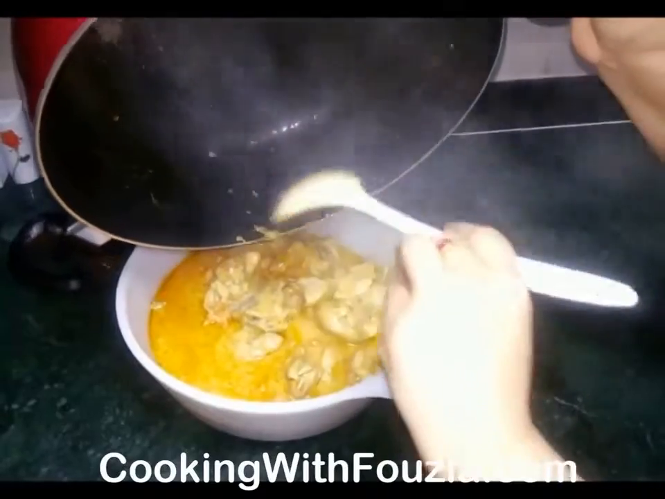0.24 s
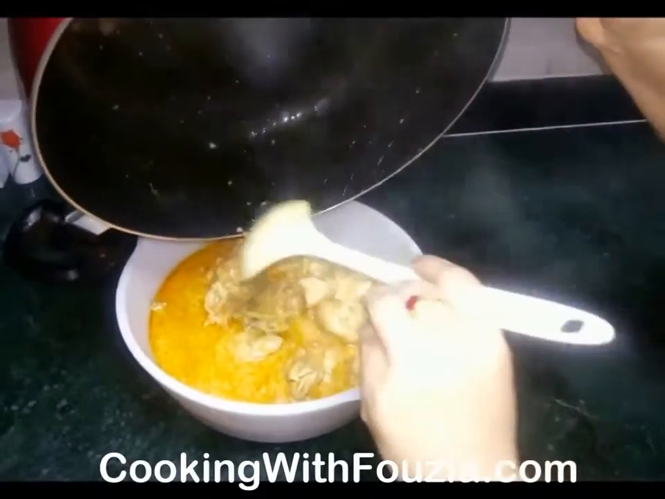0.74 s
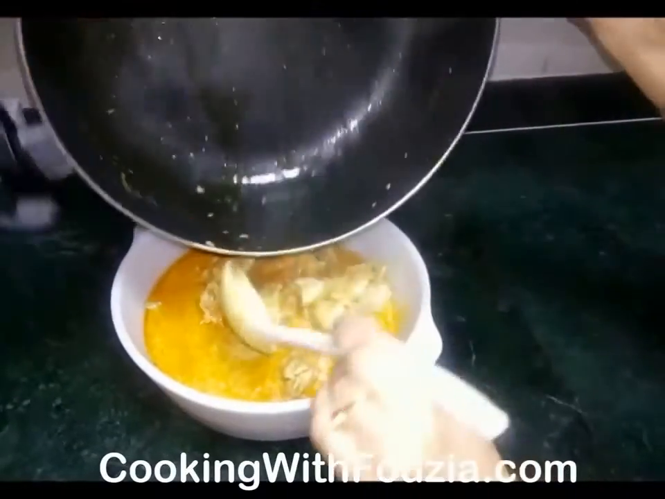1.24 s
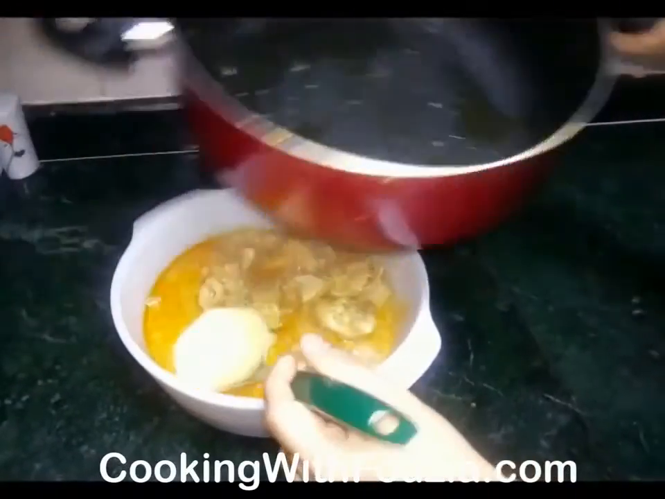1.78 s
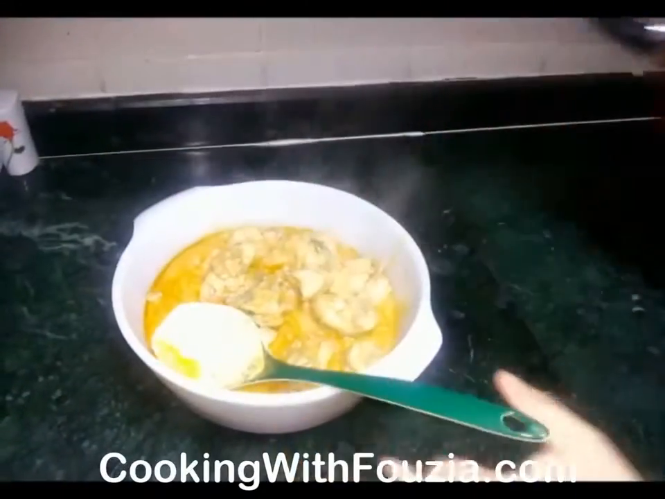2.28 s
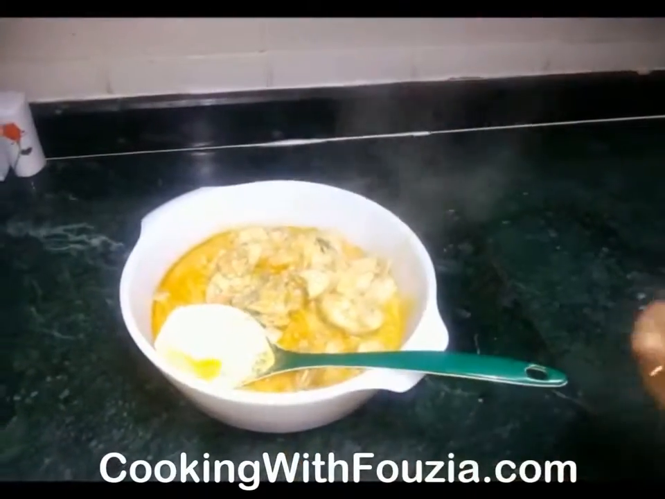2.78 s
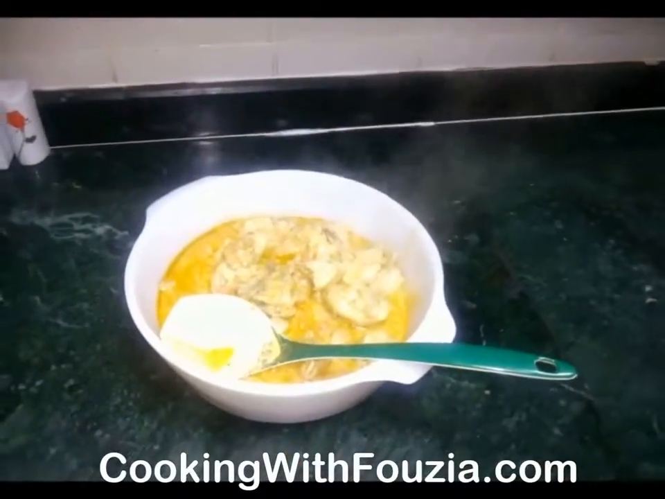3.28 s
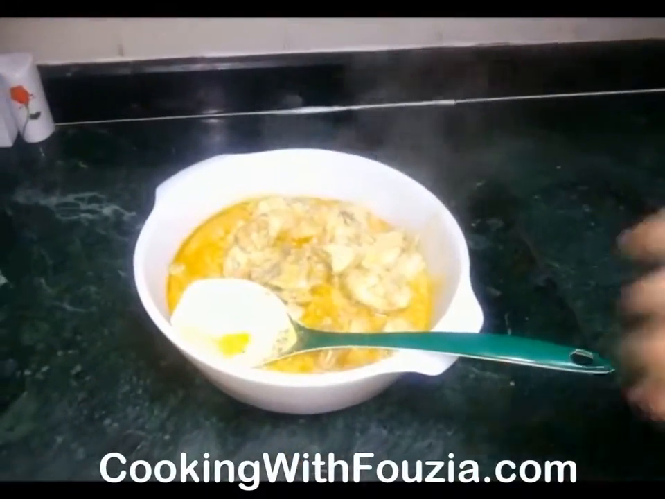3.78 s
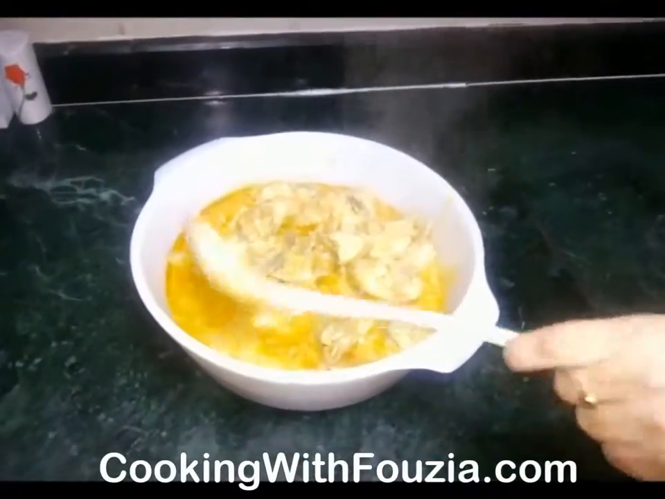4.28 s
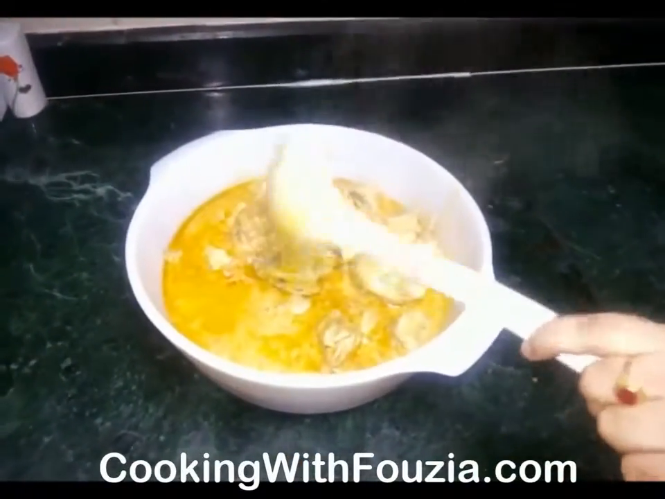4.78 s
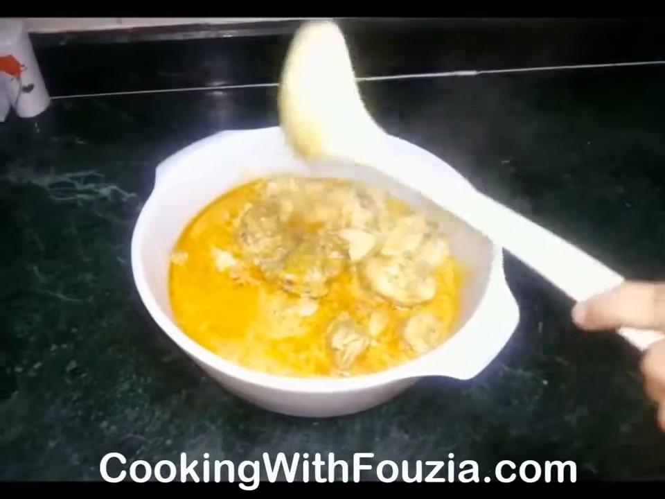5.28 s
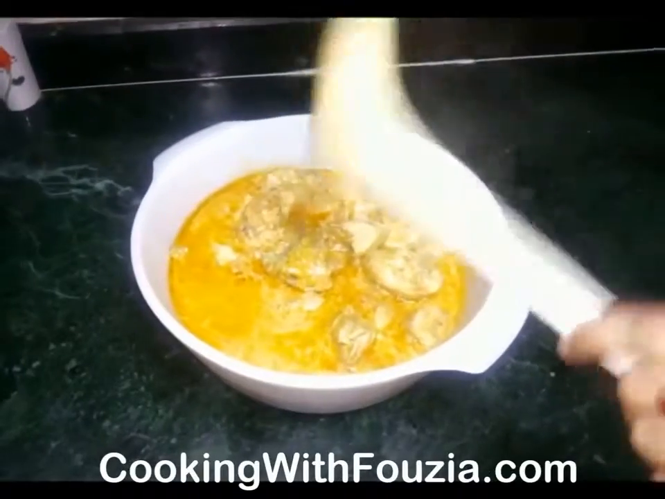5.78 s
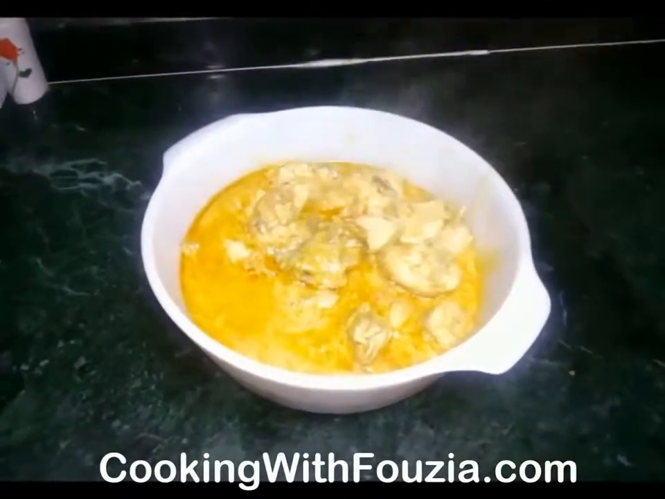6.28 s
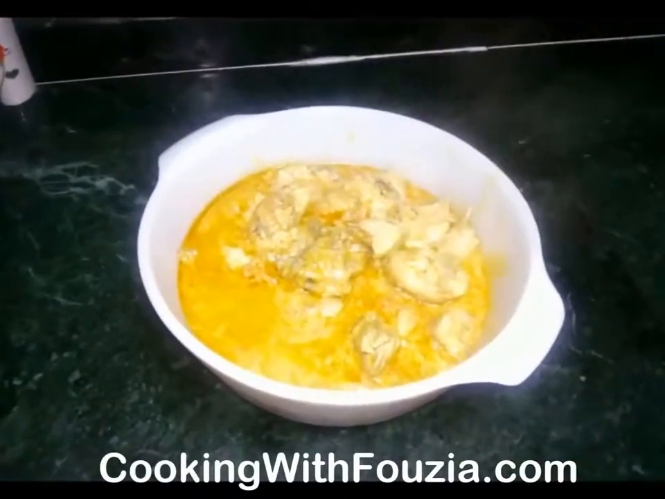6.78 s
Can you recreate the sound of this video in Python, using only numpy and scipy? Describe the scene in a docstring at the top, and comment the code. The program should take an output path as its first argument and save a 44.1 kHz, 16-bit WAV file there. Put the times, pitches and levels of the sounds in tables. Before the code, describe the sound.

Right at the start a ladle knocks inside a metal cooking pot and scrapes briefly along its wall. At about 0.5 seconds it strikes the rim with the loudest, ringing knock and a quick chatter, slightly overloading the small, close microphone. A lighter knock follows at 1.2 seconds. Between 1.9 and 2.4 seconds a spoon clinks softly several times in a china bowl, followed by small taps and faint drips of sauce. At about 3.9 seconds the pot lands on a stone counter with a damped ring and rocks to rest in fading knocks until 4.8 seconds. Faint taps come near 5.6 and 6.2 seconds. At 6.9 seconds the ladle clatters sharply onto the counter and bounces once. Throughout, a fan hums with a slight whine under faint hiss, and the hard kitchen walls add a short echo.

```python
"""Serving curry in a hard-walled kitchen

A ladle scrapes and knocks the last of the curry from a ringing metal pot. Sauce drips and a spoon
clinks in the china bowl. The empty pot lands on the stone counter and rocks, then the ladle drops
beside it. Each hit is a burst of shaped noise, with decaying sine modes wherever the object rings.
A fan hums under a faint hiss, and the small, close microphone clips on the loudest blows."""
import sys
import numpy as np
from scipy import signal
from scipy.fft import rfft, irfft, next_fast_len
from scipy.io import wavfile
from scipy.ndimage import map_coordinates

SR = 44100
rng = np.random.default_rng(int(sys.argv[2]) if len(sys.argv) > 2 else 0)


def output_pcm(signal):
    """Save a mono or channel-first signal as 16-bit PCM at the path in sys.argv[1].

    Samples are clipped to [-1, 1] before scaling.
    """
    pcm = np.clip(np.atleast_2d(signal).T, -1, 1) * 32767
    wavfile.write(sys.argv[1], SR, np.round(pcm).astype(np.int16))


N = 310905

# Thud, body, clack and fizz, the four bands of a hit: low f/Hz, high f/Hz
BANDS = [(100, 700), (700, 2500), (2500, 7000), (7000, 15800)]
# Each object's mix of those bands: level/dB for thud, body, clack, fizz
POT_BALANCE = [-22, -0.5, -0.5, -17]
TAP_BALANCE = [-12, 2.5, 4, -3.5]
SPOON_BALANCE = [-9, 0, 0.5, -18]
LANDING_BALANCE = [-10, 0, 1, -17]
LADLE_BALANCE = [-19.5, .5, -1, -9]
# EQ curves for the contact noises, the fan's rush and the hiss: f/Hz, level/dB
POT_EQ = [(90, -59), (180, -6.5), (330, -3), (420, 3.5), (600, -3), (900, -16), (1300, -11), (1950, -2.5),
          (2400, -10.5), (2800, -9.5), (3600, -18), (4600, -8.5), (6000, -17), (15500, -47)]
SCRAPE_EQ = [(150, -55), (250, -21), (387, -18), (499, -16), (698, -11), (1140, -6.5), (1440, -9.5),
             (1860, 1), (2350, -13.5), (2640, -13), (2780, -30), (3290, -13.5), (3580, -21), (5180, -12.5),
             (14000, -44.5)]
SPOON_EQ = [(120, -14), (300, -13), (520, 2), (760, -9), (1150, -6), (1750, 0.5), (2400, -8), (3050, -1.5),
            (3500, -7.5), (5200, -8), (7000, -16.5), (9000, -16), (15500, -42)]
LANDING_EQ = [(90, -16), (150, -7.5), (300, -2.5), (500, -3.5), (620, -0.5), (900, -0.5), (1300, -4.5),
              (1700, 1), (2400, -4.5), (3100, 4.5), (4300, -1.5), (5500, -1.5), (7200, -14), (15500, -38)]
LADLE_EQ = [(130, -60), (250, -26), (500, -18), (900, -18), (1150, -14), (1500, -1), (2000, -3.5),
            (2700, -9), (4300, -10.5), (5900, -5), (7000, -16), (9500, -24.5), (12500, -37), (15500, -34)]
RUSH_EQ = [(15, -64), (25, -28), (69, -32), (86, -19), (253, -7), (378, -6), (410, -6.5), (445, -6),
           (598, -10), (762, -9), (919, -11), (1080, -8), (2490, -20.5), (5280, -34), (15500, -35)]
HISS_EQ = [(1200, -3.5), (2500, -5.5), (5500, -3), (7500, -14.5), (15000, -20.5)]

# Names of the spots where the pot is struck: inside, rim, wall, base, heel
POT_PLACES = ["inside", "rim", "wall", "base", "heel"]
# The pot's modes: f/Hz, t60/s, then level/dB for a hit on each of those spots
POT_MODES = [(392.0, 0.14, -15.0, -2.0, 8, 8, -6.0), (455.0, 0.13, -25.0, -9.0, -4.0, 20, 17),
             (474.0, 0.36, 0.0, 4.0, 11.0, -3.0, -6.0), (780.0, 0.45, -18.0, 5.0, -6.0, -1.0, 8.0),
             (890.0, 0.25, -23.0, -11.0, -29.0, -3.0, 10), (1148.0, 0.72, -11.0, 6.0, -26.0, 8.0, -3.0),
             (1316.0, 0.33, -33.0, 6.0, -24.0, -8.0, -10.0), (1368.0, 0.52, -32.0, 6.0, 1.0, -4.0, -9.0),
             (1450.0, 0.33, -27.0, -7.0, -20.0, 4.0, -4.0), (1790.0, 0.34, -8.0, 0.0, -31.0, -10.0, -15.0),
             (1965.0, 0.3, -20.0, 1.0, -25.0, 1.0, -4.0), (2290.0, 0.45, -32.0, -7.0, -36.0, -16.0, -21.0),
             (2595.0, 0.45, -28.0, -8.0, -13.0, -14.0, -4.0),
             (2826.0, 0.45, -34.0, -12.0, -13.0, -21.0, -26.0),
             (2917.0, 0.4, -38.0, -11.0, -17.0, -20.0, -25.0),
             (3320.0, 0.33, -10.0, -13.0, -32.0, -20.0, -25.0),
             (3445.0, 0.28, -37.0, 5.0, -16.0, -4.0, -9.0),
             (3865.0, 0.34, -31.0, -19.0, -11.0, -7.0, -12.0),
             (4082.0, 0.32, -10.0, -9.0, -36.0, -28.0, -28.0),
             (4240.0, 0.36, -18.0, -8.0, -25.0, -26.0, -28.0),
             (4378.0, 0.35, -13.0, -6.0, -10.0, -15.0, -20.0),
             (4535.0, 0.33, -28.0, -5.0, -26.0, -21.0, -26.0),
             (4695.0, 0.35, -21.0, -7.0, -10.0, -23.0, -28.0),
             (4895.0, 0.34, -34.0, -13.0, -15.0, -15.0, -20.0),
             (5042.0, 0.35, -17.0, -8.0, -5.0, -20.0, -25.0),
             (5210.0, 0.36, -37.0, -10.0, -30.0, -16.0, -21.0),
             (5320.0, 0.33, -18.0, -23.0, -30.0, -10.0, -15.0),
             (5776.0, 0.3, -30.0, -2.0, -26.0, -17.0, -22.0),
             (6826.0, 0.28, -42.0, -7.0, -18.0, -28.0, -28.0),
             (7467.0, 0.2, -26.0, -17.0, -6.0, -19.0, -24.0)]
# Knocks on the pot, by the ladle inside and on the rim, then the pot's wall against the china bowl: t/s,
# rise/s, level/dB, brightness/dB per band, ring level/dB, spot
POT_KNOCKS = [(0.0, 0.0013, -17, -3, -17.5, "inside"), (.163, 0.0056, -33, 3.5, -20.5, "inside"),
              (.4653, 0.0002, -3.5, -3.5, -21.5, "rim"), (1.1925, 0.0024, -29, 12, -21.5, "wall")]
# Dead touches on the already ringing pot: t/s, rise/s, level/dB, brightness/dB per band
POT_CHATTER = [(.484, .003, -18.5, 1), (.516, 0.0049, -19.5, 1), (1.194, 0.0014, -34.5, -21)]
# The tones of the fan's whine: f/Hz, level/dB
FAN_TONES = [(258.4, -63.5), (646, -60), (766, -51)]
# Swells in the whine and in the hiss: centre t/s, half width/s, boost/dB
WHINE_SWELLS = [(2.6, 0.083, 8.6), (4.9, 1.97, 5.5), (6.5, 0.33, 4.5)]
HISS_SWELLS = [(2.27, 0.42, 12.7), (2.93, 0.16, 10.4), (6.7, 0.73, 10)]
# Bright little taps and dull drips: t/s, rise/s, level/dB, brightness/dB per band
TAPS_AND_DRIPS = [(1.012, 0.0021, -55, 2.5), (1.829, .0012, -61, 18.5), (2.441, 0.0036, -47, 1),
                  (2.767, 0.00026, -42, -4), (3.335, 0.0083, -64, -21.5), (3.731, 0.0015, -69.5, -28.5),
                  (5.638, 0.017, -55.5, 1.5), (6.212, 0.0087, -47.5, -2)]
# Spoon hits in the bowl: t/s, rise/s, level/dB, brightness/dB per band
SPOON_CLINKS = [(1.8955, 0.0021, -28, -2), (2.153, 0.0078, -34, -0.5), (2.331, 0.0017, -32.5, -1),
                (2.366, 0.0047, -35, -1.5)]
# The part of the spoon that meets the bowl: t/s, position (0 = blade, 1 = handle)
SPOON_CONTACT = [(1.9, 0.34), (2.16, 0.073), (2.33, 0.72), (2.8, 1)]
# Modes of spoon and bowl: f/Hz, level/dB, t60/s, sweet spot (0 = blade, 1 = handle)
BOWL_MODES = [(468, -6, .18, .3), (1100, -3, .25, 0), (1177, -7, .25, 0), (1630, -10, .18, .8),
              (1921, 2, .27, 1), (2052, -9, .17, .1), (2990, -11, .18, .5), (3193, -9, .2, 0),
              (3810, -16, .18, .8), (4380, -16, .18, .5)]
# The pot's hits on the counter as it lands and rocks: t/s, rise/s, level/dB, brightness/dB per band
POT_LANDING = [(3.879, 0.0022, -21.5, 5), (3.885, 0.0052, -14.5, -4), (3.958, 0.0085, -17, 0),
               (4.041, 0.0044, -15, 3), (4.093, 0.01, -19.5, -3), (4.11, 0.0039, -27.5, -12),
               (4.19, 0.031, -42.5, 6.5), (4.305, 0.0031, -25.5, -4.5), (4.372, 0.0048, -36, -12.5),
               (4.522, 0.0084, -31.5, -7.5), (4.716, .011, -37.5, -10), (4.81, 0.0028, -47, -12.5)]
# The ladle's drop and bounce: t/s, rise/s, level/dB, brightness/dB per band
LADLE_DROPS = [(6.877, 0.0021, -9, -0.5), (6.917, 0.0036, -17.5, 2)]
# The ladle's modes: f/Hz, level/dB, t60/s
LADLE_MODES = [(1450, -13, .2), (1585, -7, .27), (1795, -4, .25), (1970, -1, .22), (2165, -5, .19),
               (2960, -13, .22), (3640, -11, .2), (4060, -11, .22), (5030, -13, .25), (5593, -9, .25),
               (6228, -9, .22), (7776, -13, .28), (8375, -15, .15), (12190, -12, .17)]
# The kitchen's reverb time: f/Hz, t60/s
KITCHEN_DECAY = [(150, 1), (500, 0.6), (2000, 0.42), (5000, 0.38), (12000, 0.33)]

HARD_T60_S = 0.032  # decay of the hardest possible contact


def amp(db):
    """Decibels to gain."""
    return 10 ** (np.asarray(db) / 20)


def unit(x):
    """Normalise to rms 1."""
    return x / np.sqrt(np.mean(x ** 2) + 1e-20)


def along(curve, hz):
    """Read a curve on a log frequency axis."""
    freqs, values = np.transpose(curve)
    return np.interp(np.log(hz + 1), np.log(freqs + 1), values)


def equalise(x, eq, band=(0, np.inf)):
    """Shape x with an EQ curve, keep one band and normalise to rms 1."""
    hz = np.fft.rfftfreq(len(x), 1 / SR)
    return unit(irfft(rfft(x) * amp(along(eq, hz)) * (hz >= band[0]) * (hz < band[1]), len(x)))


def fade(t, t60):
    """Exponential decay, 60 dB down at t60."""
    return np.exp(-np.log(1000) * t / t60)


def wobble(rate_hz):
    """Smooth random modulation."""
    knots = rng.standard_normal(int(N * rate_hz / SR) + 4)
    return map_coordinates(knots, [np.arange(N) * rate_hz / SR])


def swells(rows):
    """A fader ride in dB, made of bell-shaped boosts."""
    t = np.arange(N) / SR
    return sum(db * np.exp(-((t - s) / width) ** 2) for s, width, db in rows)


def add(track, s, sound):
    """Mix a sound into a track at s seconds."""
    start = max(round(s * SR), 0)
    track[start:start + len(sound)] += sound[:N - start]


def kitchen(x, wet_db, build_s=0.0036, low_cut_hz=84):
    """Add the hard walls' reverb: quick to build, first to die in the treble. The deep bass is cut away."""
    hz, t, noise = signal.stft(rng.standard_normal(SR // 2), SR, nperseg=256)
    decay = amp(-60 * t / along(KITCHEN_DECAY, hz)[:, None])
    tail = signal.istft(noise * decay, SR, nperseg=256)[1]
    tail *= 1 - np.exp(-np.arange(len(tail)) / SR / build_s)
    reverb = signal.fftconvolve(x, tail / np.linalg.norm(tail))[:len(x)]
    low_cut = signal.butter(4, low_cut_hz, "highpass", fs=SR, output="sos")
    return signal.sosfilt(low_cut, x + amp(wet_db) * reverb)


def contact_t60(rise):
    """Decay time of a contact: the softer the attack, the longer it lingers."""
    return HARD_T60_S + 5.4 * rise


def transient(rise, db, bright_db, balance, eq):
    """The dense, quickly damped vibration of one contact; brightness tilts it toward the upper bands."""
    t = np.arange(SR) / SR
    envelope = (1 - np.exp(-t / rise)) ** 2 * fade(t, contact_t60(rise))
    envelope /= envelope.max()
    steps = np.arange(len(BANDS))
    levels = db + np.array(balance) + bright_db * (steps - steps.mean())
    bursts = [envelope * equalise(rng.standard_normal(SR), eq, band) for band in BANDS]
    mix = sum(amp(level) * unit(burst) for level, burst in zip(levels, bursts))
    return np.sqrt(np.mean(envelope ** 2)) * mix


def ring(modes, rise):
    """Modes (f/Hz, level/dB, t60/s) ring out freely, in a slightly new blend on every hit."""
    t = np.arange(3 * SR // 4) / SR
    tones = sum(amp(db + .5 * rng.normal()) * fade(t, t60) * np.sin(2 * np.pi * (hz * t + rng.random()))
                for hz, db, t60 in modes)
    return tones * (1 - np.exp(-t / rise))


def strikes(hits, modes_at, balance, eq, ring_db, wet_db, ring_wet_db, glance=0, ring_lag=1.6):
    """Transient plus ring. The ring grows with level and length; glance cuts it on bright, grazing hits."""
    track = np.zeros(N)
    for s, rise, db, bright_db in hits:
        add(track, s, kitchen(transient(rise, db, bright_db, balance, eq), wet_db))
        push = amp(db - glance * bright_db) * contact_t60(rise) / HARD_T60_S
        ringing = ring(modes_at(s), ring_lag * rise)
        add(track, s, amp(ring_db) * push * kitchen(ringing, ring_wet_db))
    return track


def pot_modes(place, damping=1):
    """The pot's modes for a hit on one spot; damping shortens their ring."""
    return [(hz, levels[POT_PLACES.index(place)], t60 / damping) for hz, t60, *levels in POT_MODES]


def pot_knocks():
    """The ladle knocks and chatters on the held pot, which rings freely, and the pot's wall knocks against the
    china bowl."""
    track = np.zeros(N)
    for s, rise, db, bright_db, ring_db, place in POT_KNOCKS:
        add(track, s, kitchen(transient(rise, db, bright_db, POT_BALANCE, POT_EQ), wet_db=-0.5))
        add(track, s, amp(ring_db) * ring(pot_modes(place), rise))
    for s, rise, db, bright_db in POT_CHATTER:
        add(track, s, kitchen(transient(rise, db, bright_db, POT_BALANCE, POT_EQ), wet_db=0.5))
    return track


def ladle_scrape(slips_per_s=900, rub=0.18, ring_db=-11, start_db=-32, press_db_per_s=56, lift_s=0.13):
    """The ladle sticks and slips ever harder along the pot wall, which sings, damped; then it lifts off."""
    t = np.arange(N) / SR
    slips = (rng.random(N) < slips_per_s / SR) * rng.standard_normal(N)
    friction = slips + rub * rng.standard_normal(N)
    wall_ring = ring(pot_modes("inside", damping=2), rise=0.0013)
    singing = signal.fftconvolve(friction, wall_ring)[:N]
    scrape = equalise(friction, SCRAPE_EQ) + amp(ring_db) * unit(singing)
    pressure = amp(start_db + press_db_per_s * np.minimum(t, lift_s))
    release = fade(np.maximum(t - lift_s, 0), t60=0.091)
    return kitchen(scrape * pressure * release, wet_db=3.5)


def fan(rush_db=-43.5, whine_trim_db=-2):
    """The fan lays down a bed of rushing air and a slightly unsteady whine that swells and sinks."""
    t = np.arange(N) / SR
    rush = amp(rush_db + 0.15 * wobble(16)) * equalise(rng.standard_normal(N), RUSH_EQ)
    whine = np.zeros(N)
    for hz, db in FAN_TONES:
        peak = np.sqrt(2) * amp(db + 0.82 * wobble(13))
        whine += peak * np.sin(2 * np.pi * hz * t + .5 * wobble(5.6))
    return rush + amp(whine_trim_db + swells(WHINE_SWELLS)) * whine


def hiss(floor_db=-59.5):
    """A faint hiss that swells three times."""
    return amp(floor_db + swells(HISS_SWELLS)) * equalise(rng.standard_normal(N), HISS_EQ)


def taps_and_drips():
    """Light touches and falling drops of sauce, too soft to ring anything."""
    track = np.zeros(N)
    for s, rise, db, bright_db in TAPS_AND_DRIPS:
        add(track, s, kitchen(transient(rise, db, bright_db, TAP_BALANCE, SPOON_EQ), wet_db=1.0))
    return track


def spoon_clinks(miss_db=45):
    """The spoon settles in the bowl, blade first, then handle; each mode is loudest at its sweet spot."""
    def modes_at(s):
        position = np.interp(s, *np.transpose(SPOON_CONTACT))
        return [(hz, db - miss_db * (position - spot) ** 2, t60) for hz, db, t60, spot in BOWL_MODES]

    return strikes(SPOON_CLINKS, modes_at, SPOON_BALANCE, SPOON_EQ,
                   ring_db=7.5, wet_db=1.5, ring_wet_db=-7)


def pot_landing(flat_boost_db=8.5, stone_damping=1.32, tips_at_s=3.95):
    """The pot lands flat, ringing hardest, then tips and rocks to rest on its heel; the stone damps it."""
    base = [(hz, db + flat_boost_db, t60) for hz, db, t60 in pot_modes("base", stone_damping)]
    heel = pot_modes("heel", stone_damping)
    return strikes(POT_LANDING, lambda s: base if s < tips_at_s else heel, LANDING_BALANCE, LANDING_EQ,
                   ring_db=-25.5, wet_db=1.5, ring_wet_db=-10, glance=1.84)


def ladle_drop():
    """The ladle clatters onto the counter and bounces once."""
    return strikes(LADLE_DROPS, lambda s: LADLE_MODES, LADLE_BALANCE, LADLE_EQ,
                   ring_db=-6, wet_db=3.0, ring_wet_db=-17)


def scene():
    """The kitchenware over the fan and hiss, mixed in mono."""
    serving = pot_knocks() + ladle_scrape() + spoon_clinks()
    setting_down = pot_landing() + ladle_drop()
    return (serving + setting_down + taps_and_drips() + fan() + hiss())[None]


def record(dry, hardness=9, low_cut_hz=35, top_hz=15850):
    """The small microphone flattens the loudest peaks and loses the deepest bass and the very top."""
    clipped = dry / (1 + np.abs(dry) ** hardness) ** (1 / hardness)
    thinned = signal.lfilter(*signal.butter(1, low_cut_hz, "highpass", fs=SR), clipped)
    size = next_fast_len(N + SR // 2)
    passband = np.fft.rfftfreq(size, 1 / SR) < top_hz
    return irfft(rfft(thinned, size) * passband, size)[:, :N]


dry = scene()
out = record(dry)
output_pcm(out)
```